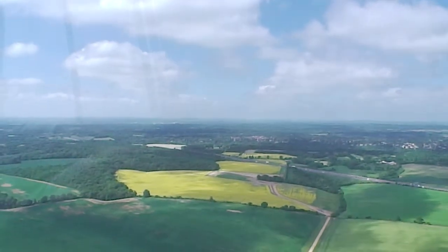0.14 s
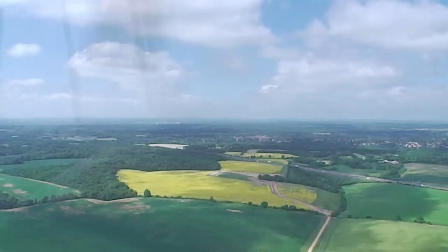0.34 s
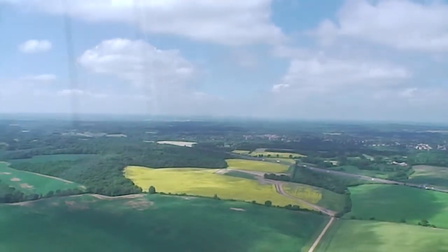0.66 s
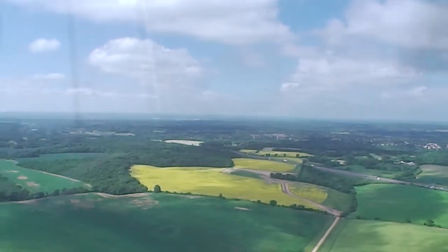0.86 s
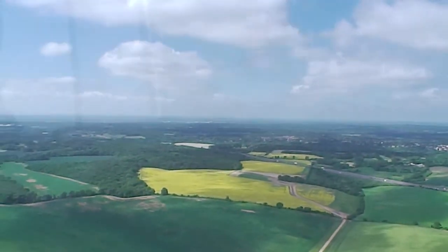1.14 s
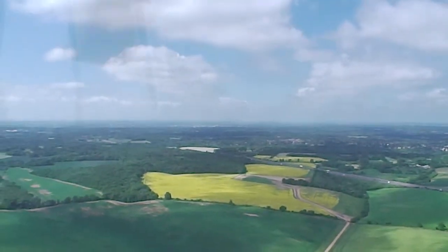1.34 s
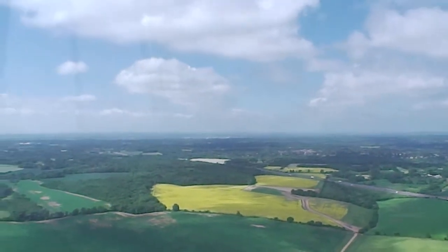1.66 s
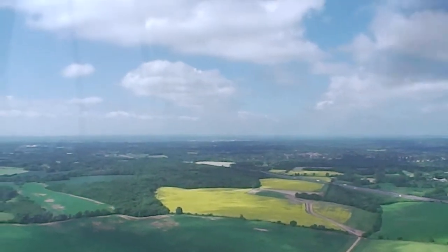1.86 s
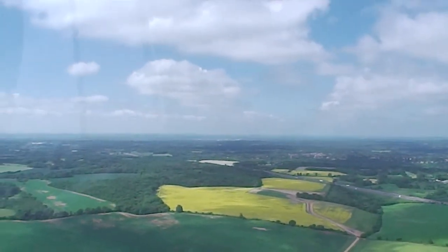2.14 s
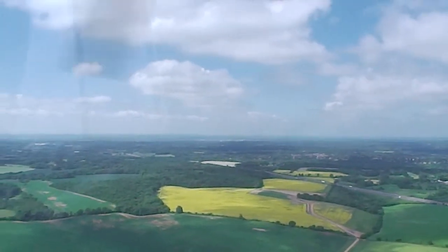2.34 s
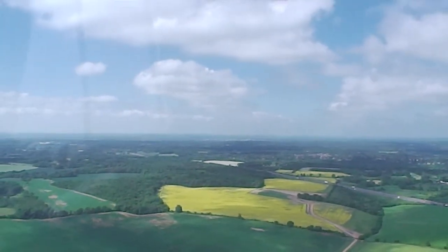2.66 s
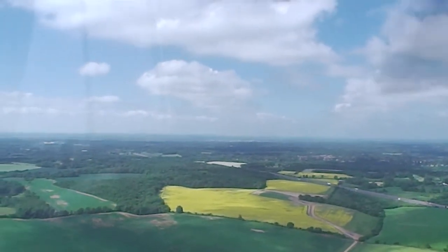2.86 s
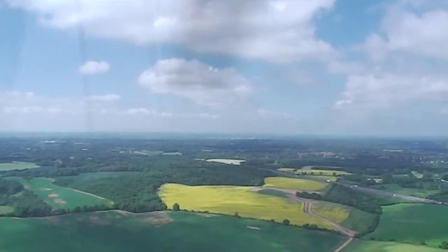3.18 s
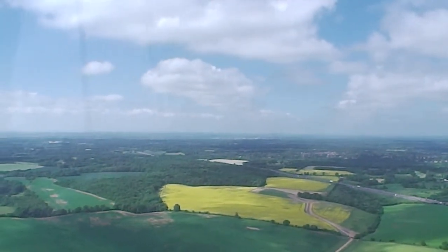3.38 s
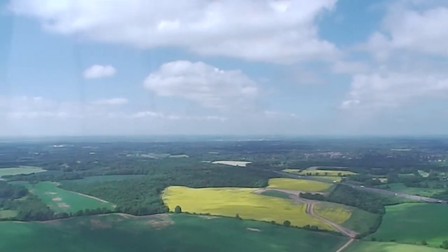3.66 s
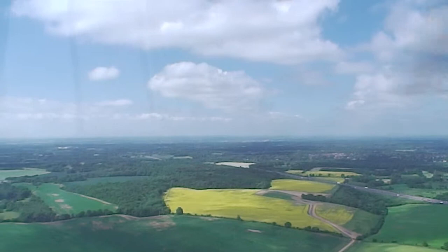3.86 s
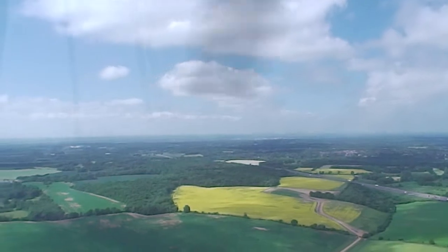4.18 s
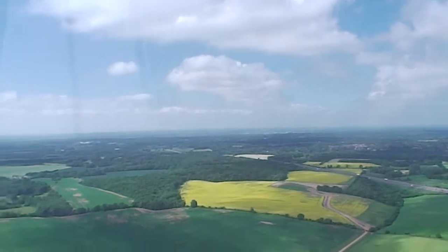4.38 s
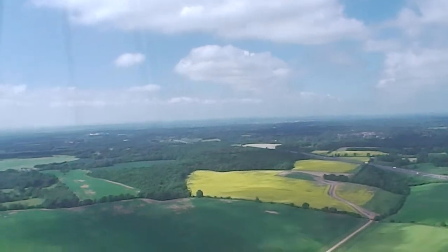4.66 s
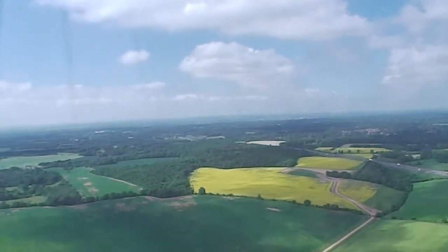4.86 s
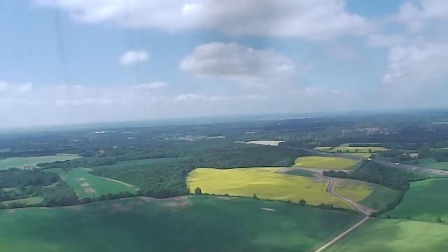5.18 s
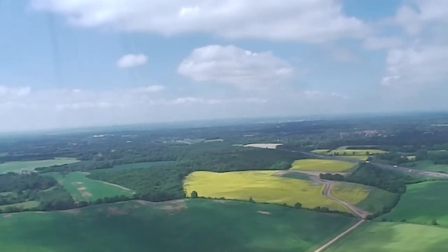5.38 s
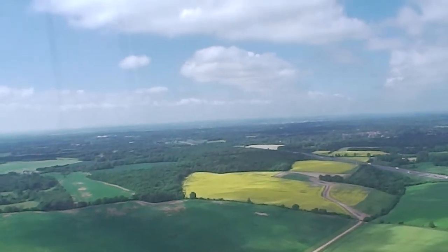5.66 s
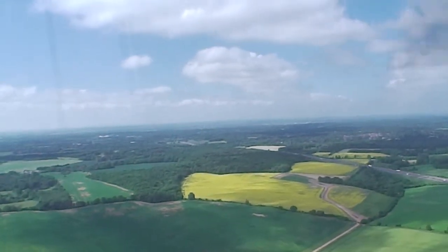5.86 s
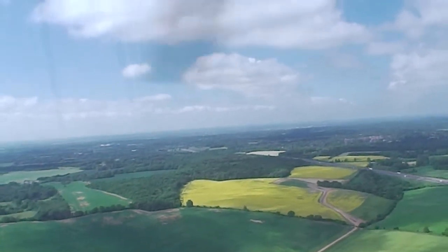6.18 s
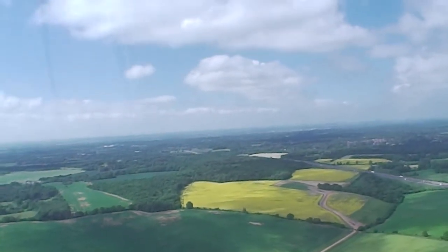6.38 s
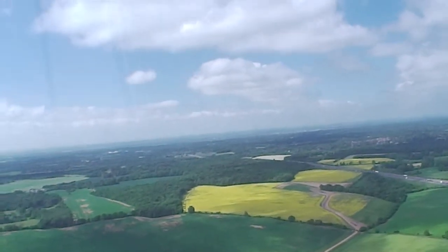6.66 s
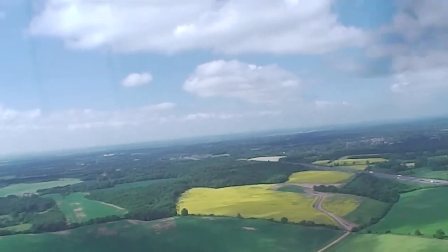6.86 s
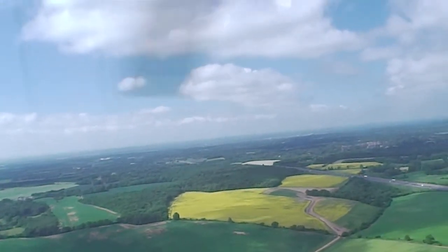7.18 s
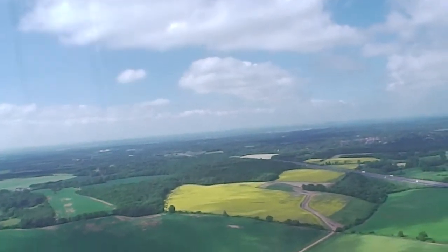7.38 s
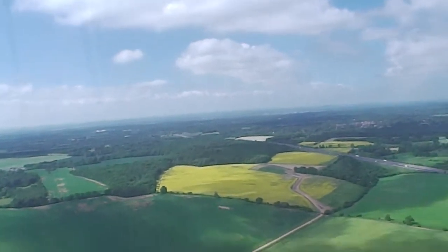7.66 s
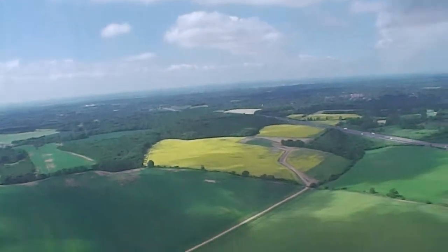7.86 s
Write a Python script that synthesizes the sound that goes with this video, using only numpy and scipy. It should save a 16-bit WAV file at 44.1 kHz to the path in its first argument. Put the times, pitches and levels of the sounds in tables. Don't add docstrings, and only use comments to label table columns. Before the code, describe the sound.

Inside a helicopter cruising over farmland, a loud continuous roar fills the cabin. Deep slipstream rumble and buffeting blend with buzzing rotor and tail-rotor hum, a mid-pitched gear whine and a thin, rough, very high turbine whistle. Nothing starts or stops; a small stereo microphone close in the cabin overloads slightly, making the roar dip and recover irregularly.

```python
import sys
import numpy as np
from scipy import signal
from scipy.fft import rfft, irfft, next_fast_len
from scipy.io import wavfile
from scipy.ndimage import uniform_filter1d, minimum_filter1d

SR = 44100
rng = np.random.default_rng(int(sys.argv[2]) if len(sys.argv) > 2 else 0)


def voltage_ratio(decibels):
    exponent = np.asarray(decibels, float) / 20
    return 10 ** exponent


def persist_wave(psi):
    counts = np.round(np.clip(psi, -1, 1) * 32767).astype(np.int16)
    wavfile.write(sys.argv[1], SR, np.atleast_2d(counts).T)


N = 354123
T = np.arange(N) / SR

ROTOR, TAIL, SHAFT, PUMP = 1 / 289.35, 1 / 44.69, 1 / 19, 1 / 15.43
LEAD_RAD = 0.17
LEFT_RIGHT = np.array([[0.5], [-0.5]])


def curve(table):
    s, value = np.transpose(table)
    return np.interp(T, s, value)


def across(table, hz):
    f, v = np.transpose(table)
    return np.interp(np.log(hz + 1), np.log(f + 1), v)


def walk(rate_hz):
    k = int(SR / rate_hz)
    levels = rng.standard_normal(N // 500)[:N // k + 1]
    held = np.repeat(levels, k)[:N]
    return 0.55 * uniform_filter1d(uniform_filter1d(held, k), k)


def hum(turns, orders, db, pan_db, lead_rad=LEAD_RAD, waver_db=1.8, rate_hz=5, start=None):
    out = 0
    start = rng.random(len(db)) if start is None else start
    pans_db = np.broadcast_to(pan_db, len(db))
    for order, tone_db, pan, turn in zip(orders, db, pans_db, start):
        phase = 2 * np.pi * (order * turns + turn)
        level = np.sqrt(2) * voltage_ratio(tone_db + waver_db * walk(rate_hz)) * voltage_ratio(pan * LEFT_RIGHT)
        out = out + level * np.sin(phase + lead_rad * LEFT_RIGHT)
    return out


def ducking():
    # t/s, gain drop/dB
    ducks = [(0, 4), (0.104, 4), (0.409, 3.5), (0.728, 3.5), (0.803, 4), (0.938, 4.5), (1.067, 3.5),
             (1.33, 5.5), (1.656, 3.5), (1.945, 2.5), (2.135, 3), (2.404, 3.5), (2.653, 1.5), (2.869, 5.5),
             (3.317, 5), (3.472, 3.5), (3.676, 2), (4.404, 3.5), (4.988, 4.5), (5.253, 5.5), (5.606, 3.5),
             (5.771, 8), (6.294, 6), (6.729, 4.5), (6.834, 4.5), (7.058, 2.5), (7.399, 5), (7.477, 3),
             (7.552, 3.5), (7.861, 3.5)]
    rests_s = [.104, .409, 1.331, 1.656, 4.988]
    nip_db, nip_gap_s, release_s = 1.73, 0.145, 0.11
    catches = np.zeros(N)
    ends = [s for s, _ in ducks[1:]] + [N / SR]
    for (s, db), end in zip(ducks, ends):
        catches[int(s * SR)] += db
        calm = min(abs(s - rest) for rest in rests_s) < 0.01
        steps = 1 if calm else max(1, round((end - s) / nip_gap_s))
        nips_s = np.linspace(s, end, steps + 1)[1:-1]
        catches[(nips_s * SR).astype(int)] += nip_db
    duck_db = signal.lfilter([1], [1, -np.exp(-1 / (release_s * SR))], catches)
    return uniform_filter1d(duck_db, size=90) - duck_db.mean()


def slipstream():
    # f/Hz, density/dB per Hz
    air = [(18, -34), (30, -9), (70, -6), (150, -1), (340, -6.5), (540, -12.5), (860, -19), (1200, -18.5),
           (1400, -23), (2100, -29), (2750, -36), (4200, -34.5), (7000, -45), (11500, -47), (15500, -51)]
    # f/Hz, width/Hz, gain/dB
    panels = [(102, 34.6, 4.5), (205, 31, 3), (252.4, 13, 5.5), (649, 92, 5), (1222, 28, 3), (1086, 30, 2),
              (2230, 110, 2.5), (1893, 130, 9), (3350, 510, 3.5), (3915, 300, 4), (4700, 130, 2),
              (5750, 410, 3)]
    # f/Hz, correlation/1
    likeness = [(20, .997), (290, .993), (640, .96), (1410, .9), (3100, .7), (6820, .58), (15000, .2)]
    # f/Hz, left minus right/dB
    balance_db = [(60, -2.5), (110, -2.5), (200, -1), (380, -1.5), (700, -2.5), (1290, 0), (2380, -2.5),
                  (4400, 1.5), (8120, 0), (15000, 3)]
    # t/s, buffet/dB
    buffet = [(0, -11), (.5, -2), (1.1, -1.5), (3, 0.5), (4, -8), (4.6, -1), (5.5, 4.5), (6, -1.5), (7, -3),
              (8.03, 1)]
    size = next_fast_len(N)
    hz = np.arange(size // 2 + 1) * SR / size
    db = across(air, hz)
    for f, width_hz, gain_db in panels:
        db = db + gain_db / (1 + ((hz - f) / (width_hz / 2)) ** 2)
    like = np.clip(across(likeness, hz), 0, 1)
    mid, side = rfft(rng.standard_normal((2, size))) * voltage_ratio(db)
    lean = voltage_ratio(across(balance_db, hz) / 2) * np.exp(0.5j * LEAD_RAD * (hz < 400))
    common = np.sqrt(1 + like) * mid
    opposed = np.sqrt(1 - like) * side * np.array([[1], [-1]])
    both = np.array([lean, 1 / lean]) * (common + opposed)

    buffet_db = curve(buffet)
    surge_db = 0.6 * uniform_filter1d(ducking(), size=2600)
    deep_db = buffet_db + surge_db
    boom_db = -0.15 - 0.061 * buffet_db + surge_db
    leak_db = 0.38 * walk(13) + 1.7 * walk(50)
    out, swell = 0, walk(9.4)
    for octave in np.arange(4, 14.6, 0.5):
        share = np.clip(1 - 2 * np.abs(np.log2(hz + 1) - octave), 0, 1)
        swell = 0.78 * swell + 0.53 * walk(8)
        if octave < 7:
            gust_db = deep_db
        elif octave < 9:
            gust_db = boom_db
        elif octave < 11.5:
            gust_db = 0
        else:
            gust_db = leak_db
        band = irfft(both * np.sqrt(share), size)[:, :N]
        out = out + voltage_ratio(gust_db + 0.36 * swell + 1.66 * walk(30)) * band
    return out * voltage_ratio(-13.5) / np.std(out.mean(0))


def compressor():
    # t/s, f/Hz
    spool = [(0, 13545), (.7, 13490), (1.4, 13448), (2.6, 13420), (3.8, 13445), (5, 13492), (5.4, 13475),
             (6.2, 13400), (7, 13410), (8.03, 13452)]
    cruise_hz = 13450
    spool_hz = curve(spool)
    turn = np.exp(2j * np.pi * np.cumsum(spool_hz) / SR)
    blade_db = -47 + 0.02 * (spool_hz - cruise_hz)
    out = voltage_ratio(blade_db + 3.5 * np.array([walk(22), walk(22)]))
    flutter_db = 1.1 * walk(10) + 1.1 * walk(40)
    for width_hz, db in [(60, -45.5), (200, -43), (550, -47)]:
        eddies = rng.standard_normal((2, N)) + 1j * rng.standard_normal((2, N))
        pole = np.exp(-2 * np.pi * width_hz / SR)
        eddies = signal.lfilter([1], np.convolve([1, -pole], [1, -pole]), eddies)
        out = out + voltage_ratio(db + flutter_db) * eddies / np.std(eddies)
    out = out + np.array([[0], [-0.25]]) * out[0]
    return (out * turn).real * voltage_ratio(np.array([[0.7], [-0.7]]))


def cooling_fan(mesh):
    tone = hum(SHAFT * mesh, orders=[70], db=[0], pan_db=0, waver_db=2.0, rate_hz=8)
    return voltage_ratio(-63 + 3.0 * walk(1.5)) * tone


def shafts(mesh):
    # order/turn, level/dB
    shaft_orders, shaft_db = [1, 2, 4, 17, 18, 48], [-30, -39, -38, -52, -50, -61]
    pump_orders, pump_db = [4, 8, 12, 12.26], [-41, -41.5, -41.5, -52]
    # t/s, length/s, level/dB
    flares = [
        (3.516, 0.11, -30),
        (6.05, .15, -58),
    ]
    flare_orders = [17, 70]
    out = hum(SHAFT * mesh, shaft_orders, shaft_db, -1.6)
    out = out + hum(PUMP * mesh, pump_orders, pump_db, -0.9, lead_rad=0)
    for (s, length_s, db), order in zip(flares, flare_orders):
        swell = voltage_ratio(db) * np.exp(-((T - s) / length_s) ** 2)
        out = out + swell * np.sin(2 * np.pi * order * SHAFT * mesh)
    return out


def ring_gear(mesh):
    # order/rotor turn, level/dB, left minus right/dB
    ring_orders, ring_db, ring_pan_db = [57.5, 115, 196, 198, 200, 202, 296, 300], [-34, -41, -45, -35.3, -45, -54, -44, -47], [-1.6, -2.1, -3, -6, -5, -2.6,
                                                                               -8, -2.3]
    return hum(ROTOR * mesh, ring_orders, ring_db, ring_pan_db, lead_rad=0.12, waver_db=1.0)


def planet_gears(mesh):
    planet_sides = np.array(np.array([-5, -3, -1, 0, 1, 3, 5, 7, 9, 11]))
    planet_db, planet_pan_db = [-36.5, -35, -31, -37, -27, -38, -39.5, -49, -48, -48], [-3.2, -2.8, -6, -3.4, -4.2, -1.6, -2.5, -1.2, -1.2, -1.9]
    ring_teeth = 99
    flips = (np.abs(planet_sides) // 2 % 2) / 2
    return hum(ROTOR * mesh + 0.31, ring_teeth + planet_sides, planet_db, planet_pan_db,
               lead_rad=0.33, waver_db=1.0, start=flips)


def pinion(mesh):
    # t/s, mesh level/dB
    load = [(0, -36), (.5, -31), (2.1, -31), (4, -28), (4.7, -30.5), (5.6, -39), (6.4, -28), (7.5, -29),
            (8.03, -28.5)]
    # offset/rotor order, level re mesh/dB
    rock_orders, rock_db = [-8, -4, 0, 2, 4], [-22, -15, 0, -21, -14]
    tone = hum(ROTOR * mesh, 1 / ROTOR + np.array(rock_orders), rock_db, -4.0,
               lead_rad=0.77, waver_db=1.0, rate_hz=25)
    return voltage_ratio(curve(load)) * tone


def tail_rotor(mesh):
    # order/tail turn, level/dB, left minus right/dB
    tail_orders, tail_db, tail_pan_db = [1, 2, 4, 6, 8, 10, 12, 14], [-32, -27.5, -19.8, -26, -24.3, -30, -38, -45], [-2.7, -2.5, -1.7, -1.7, -2.0,
                                                                               -2.2, 6, -.4]
    lead_turns = 0.1 * (np.array(tail_orders) / 2) ** 2
    return hum(TAIL * mesh, tail_orders, tail_db, tail_pan_db, waver_db=1.0, start=lead_turns)


def main_rotor(mesh):
    # order/rotor turn, level/dB
    rotor_orders, rotor_db = [6, 8, 9, 12, 14, 16, 18, 24, 27], [-31, -27, -40, -34, -36, -35, -33, -34, -37]
    return hum(ROTOR * mesh, rotor_orders, rotor_db, -2.4, waver_db=1.0)


def drive():
    # t/s, f/Hz
    drive_speed = [(0, 1884), (1.3, 1882), (2.5, 1881), (3.3, 1878), (4, 1875), (4.5, 1877), (5.2, 1883),
                   (5.7, 1885), (6.3, 1881), (7, 1878.5), (8.03, 1879)]
    mesh = np.cumsum(curve(drive_speed)) / SR
    gears = ring_gear(mesh) + planet_gears(mesh) + pinion(mesh)
    return cooling_fan(mesh) + shafts(mesh) + gears + tail_rotor(mesh) + main_rotor(mesh)


def scene():
    return slipstream() + compressor() + drive()


def band_limit(x):
    return signal.sosfilt(signal.butter(12, 15760, fs=SR, output="sos"), x)


def record(dry):
    ceiling = 0.99
    x = dry * voltage_ratio(-ducking())
    room = np.minimum(1, ceiling / (np.abs(x).max(0) + 1e-9))
    x = x * uniform_filter1d(minimum_filter1d(room, size=128), size=128)
    x = x * np.minimum(1, (T[-1] - T) * 400)
    return band_limit(x)


dry = scene()
out = record(dry)
persist_wave(out)
```